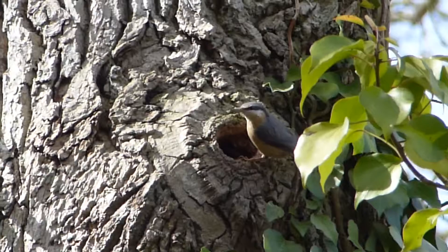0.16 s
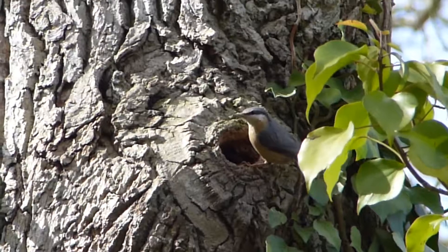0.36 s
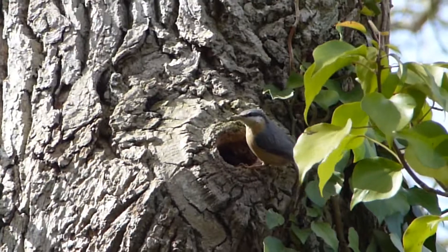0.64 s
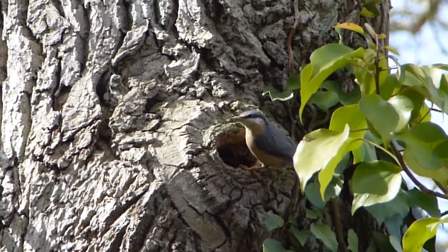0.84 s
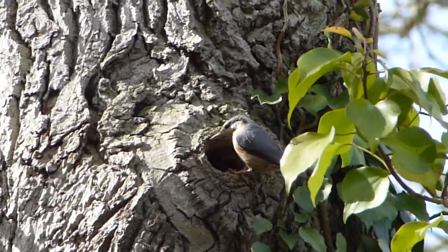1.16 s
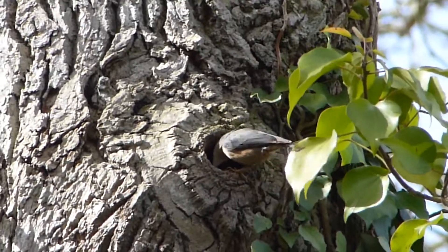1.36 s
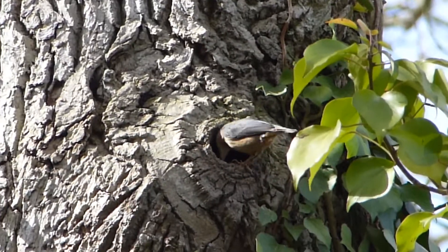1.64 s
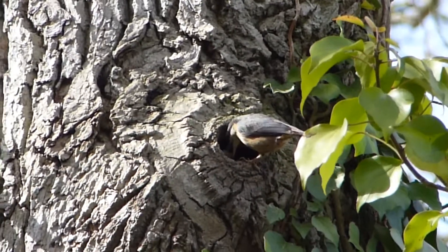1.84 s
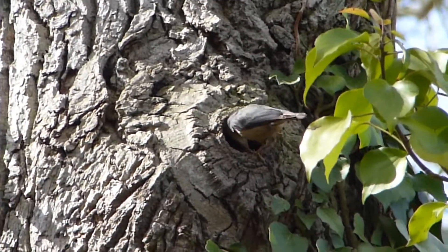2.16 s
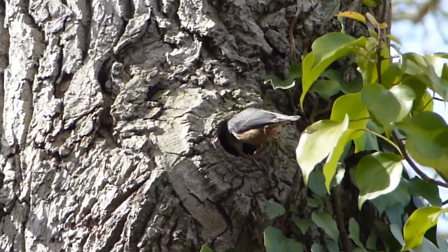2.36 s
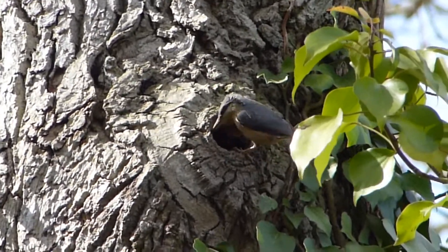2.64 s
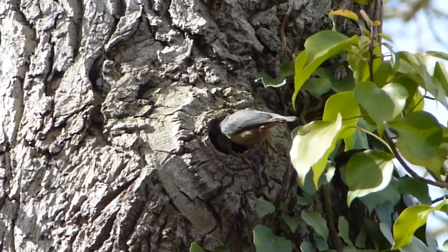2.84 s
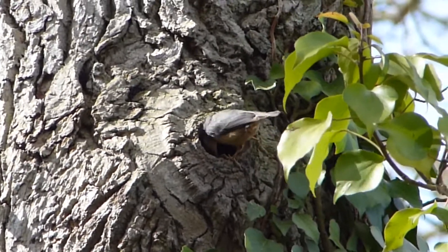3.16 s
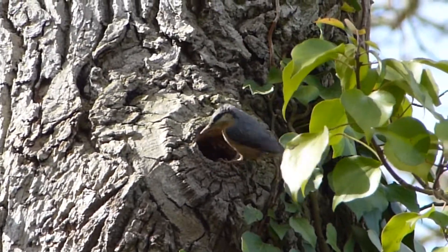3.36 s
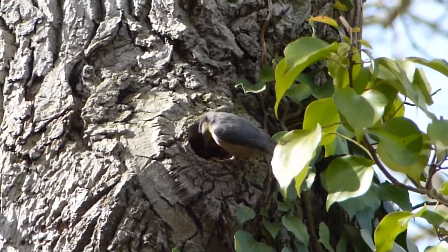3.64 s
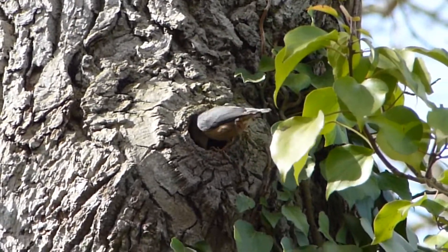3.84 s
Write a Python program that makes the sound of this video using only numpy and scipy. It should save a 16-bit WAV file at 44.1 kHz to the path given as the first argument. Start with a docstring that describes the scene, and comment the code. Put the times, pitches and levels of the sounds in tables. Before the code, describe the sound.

High, quick chirping from a small bird near the microphone, on the right, runs through repeated notes and thin whistles. Another bird then replies softly from deeper in the trees, over a steady rush of leaves and distant traffic.

```python
"""Among trees, a small bird sings close on the right: four arches, four single glides, then four pairs
of a thin tick and a falling note. A second bird answers farther off. Each note is a frequency-modulated
sine, which trunks and leaves scatter into a decaying tail. Distant traffic and wind in leaves make a
steady wash of noise, and low wind buffets the two microphones. The sound starts abruptly after a silence."""
import sys
import numpy as np
from scipy import signal
from scipy.fft import rfft, irfft, next_fast_len
from scipy.io import wavfile
from scipy.ndimage import uniform_filter1d, map_coordinates

SR = 44100
rng = np.random.default_rng(int(sys.argv[2]) if len(sys.argv) > 2 else 0)


def dump(signal):
    """Clip the signal to [-1, 1] and save it as 16-bit WAV at the path in sys.argv[1]."""
    limited = np.clip(np.atleast_2d(signal).T, -1, 1)
    pcm = np.round(limited * 32767).astype(np.int16)
    wavfile.write(sys.argv[1], SR, pcm)


N = 176400

# Spectrum of the wash. Each row: frequency in Hz, relative spectral density in dB.
WASH_SPECTRUM = [(35, -64), (60, -33), (93, -14.5), (129, -12), (187, -10.5), (259, -13), (334, -5.5),
                 (384, -4), (452, -6.5), (687, -8.5), (846, -2), (972, 0), (1070, -4.5), (1320, -1.5),
                 (1440, -1.5), (2040, -4.5), (2760, -17.5), (3740, -10.5), (4820, -12), (5680, -17.5),
                 (6680, -18), (11100, -19), (14400, -35.5), (15400, -50)]
# Loudness of the wash. Each row: time in seconds, level in dB.
WASH_LEVEL = [(0.33, -31), (1.82, -31.5), (2.13, -31), (2.53, -33), (2.97, -31), (3.2, -31), (3.45, -32),
              (4.0, -31)]
# Balance of the wash. Each row: frequency in Hz, left over right in dB.
WASH_PAN = [(60, 5), (110, 1), (200, 2.5), (380, 10.5), (700, 5.5), (1290, 5.5), (2380, 5), (4400, 2.5),
            (8120, 1.5), (15000, -0.5)]
# Phase between the channels. Each row: frequency in Hz, lead of the left in radians.
WASH_LEAD = [(60, 3.3), (350, 3.3), (600, 4.05), (800, 4.9), (1400, 5.5), (2400, 6.5), (3300, 6.0),
             (4000, 6.25), (6500, 6.5), (10000, 6.2)]
# Likeness of the channels. Each row: frequency in Hz, coherence from 0 to 1.
WASH_COHERENCE = [(60, 0.22), (130, 0.47), (260, 0.71), (430, 0.43), (800, 0.84), (1900, 0.88),
                  (2400, 0.52), (2800, 0.44), (4000, 0.81), (7000, 0.34), (14000, 0.71)]
# Spectrum of wind on the microphones. Each row: frequency in Hz, relative spectral density in dB.
BUFFET_SPECTRUM = [(15, -20), (30, -6), (90, -5), (150, 11.5), (260, -22), (400, -40)]
# Strength of that wind. Each row: time in seconds, level in dB.
BUFFET_LEVEL = [(.32, -55), (.6, -53.5), (1.6, -52), (2.4, -64), (3.4, -72), (4.0, -62)]

# Note shapes of the far bird, before stretch and pitch ratio.
# Each row: time into the note in seconds, pitch in Hz, effort in dB.
DROP = [(0, 6200, -11), (.008, 5500, -14), (.014, 5000, -5), (.024, 4020, -1), (.04, 3970, 0),
        (.062, 3900, -7)]
DEEP_DROP = [(0, 5150, -6), (.011, 4700, -9), (.018, 4000, 1), (.03, 3880, -1), (.043, 3500, 1),
             (.055, 3350, -8)]
HELD = [(0, 4010, -3), (.015, 4000, 0), (.035, 3980, -3)]
CHIP = [(0, 6600, -3), (.008, 5100, -4), (.018, 4500, 0)]
FLICK = [(0, 5400, -3), (.006, 5050, 0), (.013, 4850, -2)]
# The far answer. Each row: a shape, its notes.
# Each note: start in seconds, level in dB, time stretch, pitch ratio.
FAR_SONG = [ (DROP, [(3.535, -31, 1.0, 1.0)]), (DEEP_DROP, [(3.77, -31.5, 1.0, 1.0)]),
            (HELD, [(3.61, -42, .7, .985), (3.645, -40, .75, .995), (3.677, -36.5, .95, 1.065),
            (3.735, -43, .9, 1.03), (3.815, -39, 1.0, .975), (3.865, -44, .5, .97),
            (3.887, -38.5, 1.05, 1.035), (3.958, -40.5, .8, 1.01), (3.542, -41, .4, 1.4),
            (2.36, -43.5, .7, 1.025), (2.478, -42.5, .6, 1.015)]), (FLICK, [(3.603, -37.5, 1.1, 1.0)]),
            (CHIP, [(3.418, -41, 1.0, 1.0), (3.575, -41, .8, .76)]), ]

# Note shapes of the near bird, before stretch.
# Each row: time into the note in seconds, pitch in Hz, effort in dB.
ARCH = [(0, 4050, -13), (.009, 4450, -2), (.019, 4700, -1), (.027, 4950, 0), (.03, 5100, -12),
        (.037, 5850, -1), (.045, 6130, 0), (.053, 5600, -5), (.061, 4880, 1), (.075, 4000, -1.5),
        (.083, 3800, -11)]
HIGH_WHISTLE = [(0, 8150, -12), (.025, 8500, -1), (.05, 8600, -1), (.095, 8380, -7), (.115, 7850, 1),
                (.135, 7450, 4), (.15, 7330, -8)]
HOOK = [(0, 5300, -5), (.012, 4860, 0), (.027, 3930, 0), (.042, 3570, -3), (.074, 3540, 0)]
FLAT_WHISTLE = [(0, 5600, -3), (.006, 6000, -3), (.03, 6230, 0), (.07, 6220, -1), (.09, 6210, -7),
                (.155, 6200, -8)]
SLIDE = [(0, 7750, -6), (.02, 7120, -6), (.046, 6230, -11), (.053, 5800, 4), (.062, 5400, -9),
         (.07, 4900, 4), (.083, 4150, -5), (.09, 3950, -14)]
TICK = [(0, 5700, -12), (.008, 6000, -14), (.024, 7950, -9), (.033, 7480, -2), (.042, 6950, -2),
        (.052, 6400, -12)]
FALL = [(0, 5920, -17), (.025, 5680, -7), (.043, 5520, 1.5), (.053, 5430, -9), (.06, 5330, 3),
        (.071, 4870, 1.5), (.085, 4080, -3), (.092, 3900, -25)]
# The near song. Each row: a shape, its notes.
# Each note: start in seconds, level in dB before the path, time stretch.
NEAR_SONG = [ (ARCH, [(.311, -22, 1.0), (.494, -21, 1.0), (.68, -22, 1.03), (.871, -21, 1.01)]),
             (HIGH_WHISTLE, [(1.02, -21.5, 0.97)]), (HOOK, [(1.208, -20.5, 1.0)]),
             (FLAT_WHISTLE, [(1.33, -24.5, 1.0)]), (SLIDE, [(1.44, -20, 1.0)]), (TICK, [(1.562, -21, 1.0),
             (1.754, -22, 1.0), (1.947, -21, 1.0), (2.138, -22, 1.0)]), (FALL, [(1.637, -21, 0.99),
             (1.831, -21, 0.95), (2.022, -22, 0.96), (2.215, -22.5, 1.0)]), ]
# Path from the near bird to the right microphone. Each row: frequency in Hz, gain in dB.
NEAR_PATH = [(3500, -14), (3930, -3), (4150, -11), (4400, -16), (4650, -9), (4900, 0), (5150, -15),
             (5300, -9), (5500, -6), (5750, -11), (6020, -22), (6250, -17), (6700, -22), (7300, -16),
             (8000, -22), (8550, -12)]
# Balance of the near bird. Each row: frequency in Hz, left over right in dB.
NEAR_PAN = [(3600, -20.5), (4100, -3), (4600, -13), (4900, -11), (5700, -21), (6200, 1.5), (8500, -2.5)]


def amp(db):
    """Amplitude grows tenfold for every 20 dB."""
    return 10 ** (np.asarray(db) / 20)


def unit_rms(x):
    """Normalisation to a mean power of 1."""
    return x / np.sqrt(np.mean(x ** 2) + 1e-20)


def at_hz(table, hz):
    """Interpolation on a logarithmic frequency axis."""
    knots_hz, values = np.transpose(table)
    return np.interp(np.log(hz + 1), np.log(knots_hz + 1), values)


def over_time(table):
    """Linear interpolation in time, one value a sample."""
    return np.interp(np.arange(N) / SR, *np.transpose(table))


def wobble(rate_hz):
    """Smooth random modulation: a spline through rate_hz Gaussian knots a second."""
    knots = rng.standard_normal(int(N * rate_hz / SR) + 4)
    return map_coordinates(knots, [np.arange(N) * rate_hz / SR])


def filtered(x, response):
    """Linear filtering: the spectrum is multiplied by a complex frequency response."""
    size = next_fast_len(N + SR // 2)
    hz = np.fft.rfftfreq(size, 1 / SR)
    return irfft(rfft(x, size) * response(hz), size)[..., :N]


def traffic_and_leaves(patchy_db=0.84, drift_db=0.31):
    """Partial coherence: the channels share part of a patchy noise, with a phase lead on the left."""
    spectra = signal.stft(rng.standard_normal((2, N)), nperseg=512)[2]
    patches = uniform_filter1d(rng.standard_normal(spectra.shape[1:]), size=6, axis=0)  # across frequency
    patches = uniform_filter1d(patches, size=12, axis=1)  # across time
    shared, separate = signal.istft(spectra * amp(patchy_db * unit_rms(patches)), nperseg=512)[1][:, :N]
    pan = lambda hz: amp(at_hz(WASH_PAN, hz) / 2)
    lead = lambda hz: at_hz(WASH_LEAD, hz)
    coherence = lambda hz: at_hz(WASH_COHERENCE, hz)
    left = filtered(shared, lambda hz: pan(hz) * np.exp(1j * lead(hz)))
    right = filtered(shared, lambda hz: coherence(hz) / pan(hz))
    right += filtered(separate, lambda hz: np.sqrt(1 - coherence(hz) ** 2) / pan(hz))

    def colour(hz):
        """The channels interfere in their mean; dividing by its gain gives it the wash spectrum."""
        interference = 2 * coherence(hz) * np.cos(lead(hz))
        mean_gain = np.sqrt(pan(hz) ** 2 + pan(hz) ** -2 + interference) / 2
        return amp(at_hz(WASH_SPECTRUM, hz)) / mean_gain

    wash = filtered(np.array([left, right]), colour)
    level_db = over_time(WASH_LEVEL) + drift_db * wobble(7.33)
    return wash / np.std(wash.mean(0)) * amp(level_db)


def wind_buffet(lumpy_db=2.5, opposed=.15, top_hz=400):
    """Pressure fluctuation: wind on the microphones makes low lumps of noise, partly in antiphase."""
    spectrum = lambda hz: amp(at_hz(BUFFET_SPECTRUM, hz)) * (hz < top_hz)
    left, separate = filtered(rng.standard_normal((2, N)), spectrum)
    right = np.sqrt(1 - opposed ** 2) * separate - opposed * left
    level_db = over_time(BUFFET_LEVEL) + lumpy_db * wobble(7.6)
    return unit_rms(np.array([left, right])) * amp(level_db)


def sing(song, gains, flutter_db, waver, detune=.003, edge_s=.003):
    """Frequency modulation: a wavering sine glides along each shape; gains(pitch) sets both channels."""
    voice = np.zeros((2, N + SR))
    unsteady = 1 + waver * wobble(250)
    for shape, notes in song:
        knots_s, knots_hz, effort_db = np.transpose(shape)
        for start_s, level_db, stretch, *pitch_ratio in notes:
            t = np.arange(int(knots_s[-1] * stretch * SR)) / SR
            first = round(start_s * SR)
            span = slice(first, first + len(t))
            glide = uniform_filter1d(np.interp(t / stretch, knots_s, knots_hz), size=100, mode="nearest")
            pitch = glide * (1 + detune * rng.normal()) * np.prod(pitch_ratio)
            fade = np.clip(np.minimum(t, t[-1] - t) / edge_s, 0, 1)
            envelope = fade * amp(level_db + np.interp(t / stretch, knots_s, effort_db))
            cycles = np.cumsum(pitch * unsteady[span]) / SR + rng.random()
            voice[:, span] += np.sqrt(2) * envelope * np.sin(2 * np.pi * cycles) * gains(pitch)
    return voice[:, :N] * amp(flutter_db * wobble(160))


def among_trees(direct, echo_db, t60_s=.5, leaves_db=8, leaves_t60_s=.06, gap_s=.003):
    """Scattering: trunks and leaves add an exponentially decaying tail to the direct sound."""
    t = np.arange(SR // 2) / SR
    decay = amp(-60 * t / t60_s) + amp(leaves_db - 60 * t / leaves_t60_s)
    tail = rng.standard_normal((2, len(t))) * decay * (t > gap_s)
    tail[0] = .6 * tail[1] + .8 * tail[0]  # correlation of 0.6 between the channels
    tail /= np.linalg.norm(tail[1])
    scattered = signal.fftconvolve(direct[1:], tail, axes=1)[:, :N]  # the right channel feeds both tails
    return direct + amp(echo_db) * scattered


def far_bird(left_db=1.5, trunk_delay_s=.014, trunk_db=-5):
    """Reflection: a trunk doubles the rougher, more reverberant answer, heard near the centre."""
    voice = sing(FAR_SONG, lambda hz: amp([[left_db], [0]]), flutter_db=3, waver=.012)
    reflection = np.pad(voice, ((0, 0), (round(trunk_delay_s * SR), 0)))[:, :N]
    return among_trees(voice + amp(trunk_db) * reflection, echo_db=-5)


def path_gains(hz):
    """Transfer function: the near bird's path to each microphone favours some pitches over others."""
    right_db = at_hz(NEAR_PATH, hz)
    return amp([right_db + at_hz(NEAR_PAN, hz), right_db])


def near_bird():
    """Direct sound dominates at close range; notes swell and dip as they glide through the path's peaks."""
    voice = sing(NEAR_SONG, path_gains, flutter_db=2, waver=.004)
    return among_trees(voice, echo_db=-11)


def scene():
    """Superposition: both birds add to the wash and the wind."""
    return near_bird() + far_bird() + traffic_and_leaves() + wind_buffet()


def record(dry, start_s=.3165, rise_s=.005, top_hz=15650):
    """Gating and band limiting: silence, then a short rise, with nothing above top_hz."""
    t = np.arange(N) / SR - start_s
    rise = np.clip(t / rise_s, 0, 1)
    return filtered(dry * rise, lambda hz: hz < top_hz) * (t > 0)


dry = scene()
out = record(dry)
dump(out)
```